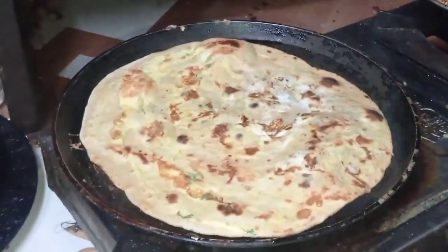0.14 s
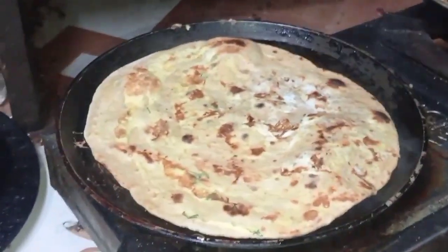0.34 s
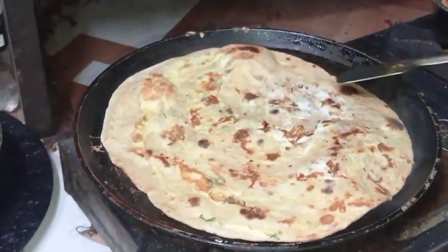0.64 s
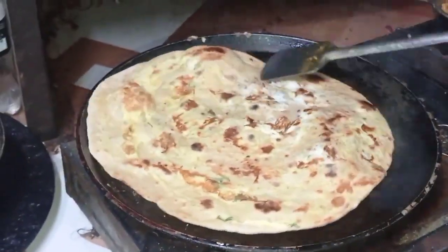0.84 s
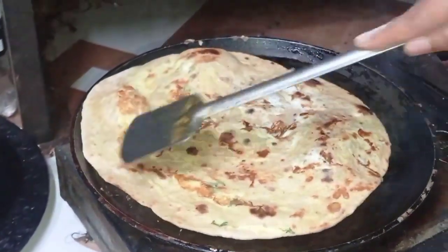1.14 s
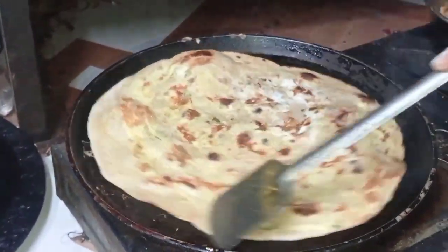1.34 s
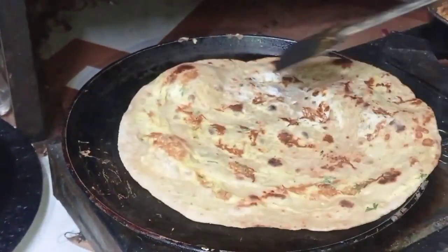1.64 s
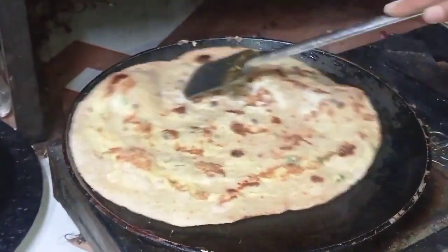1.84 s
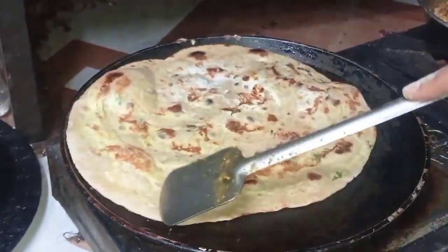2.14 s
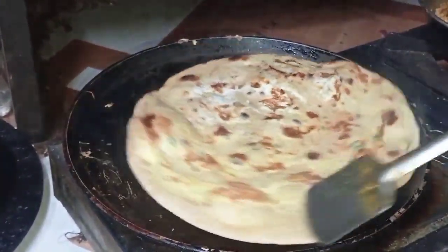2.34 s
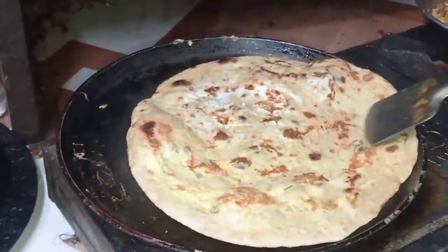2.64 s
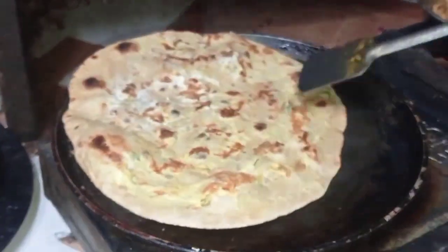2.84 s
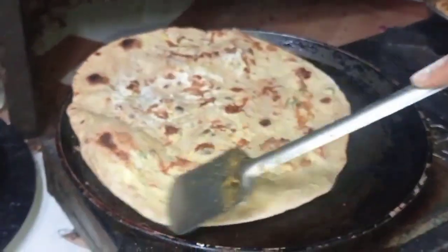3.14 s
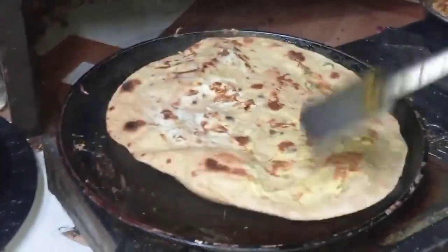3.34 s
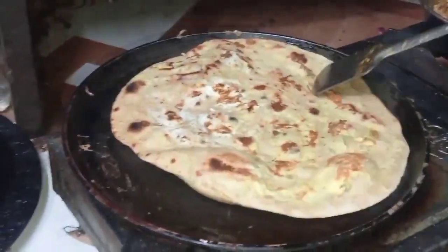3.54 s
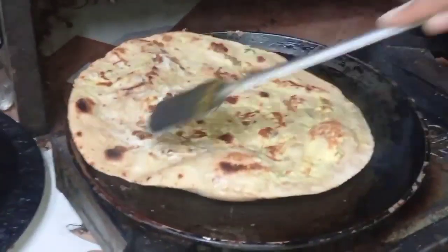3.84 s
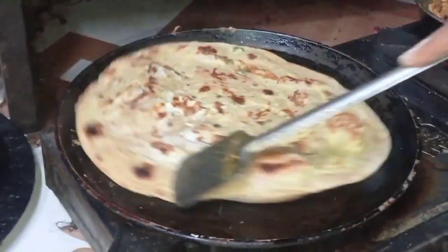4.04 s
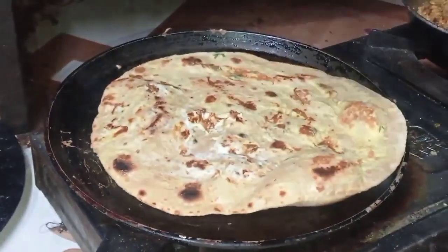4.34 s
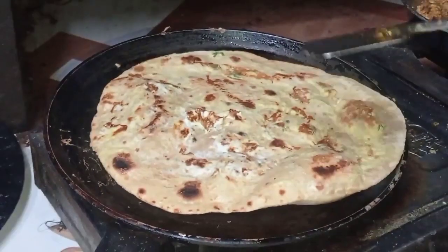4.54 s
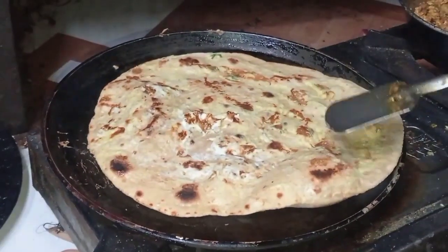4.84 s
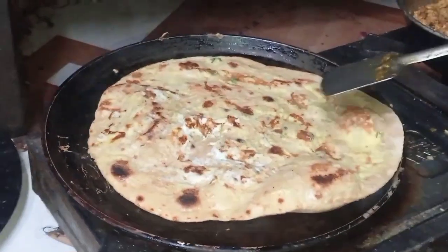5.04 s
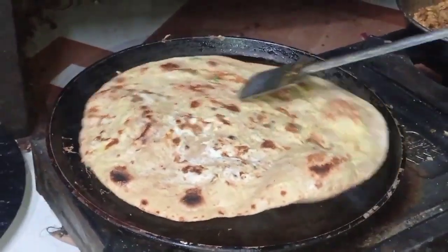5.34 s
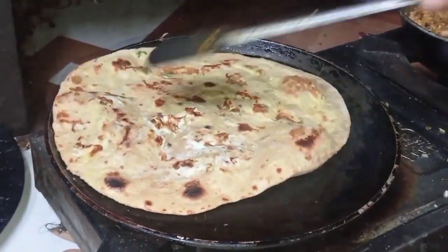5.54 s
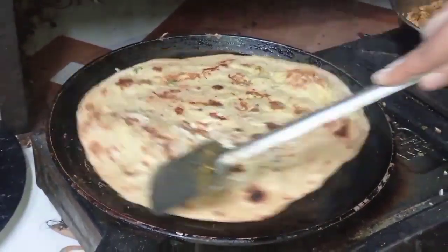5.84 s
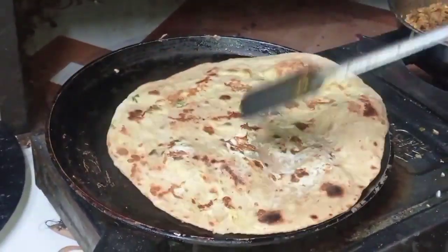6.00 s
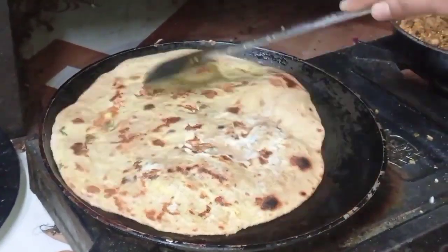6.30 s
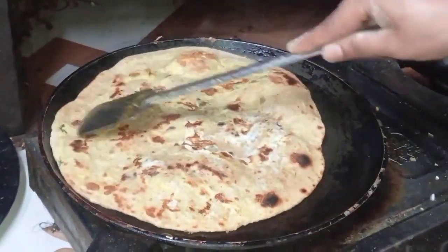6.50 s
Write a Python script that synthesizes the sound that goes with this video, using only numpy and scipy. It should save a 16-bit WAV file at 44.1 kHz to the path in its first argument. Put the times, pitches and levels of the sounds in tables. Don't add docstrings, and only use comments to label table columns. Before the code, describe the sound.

A metal spatula knocks, scrapes and shoves a flatbread around a hot iron griddle, with soft steady sizzling and two hard clanging double blows.

```python
import sys
import numpy as np
from scipy import signal
from scipy.fft import rfft, irfft, next_fast_len
from scipy.io import wavfile
from scipy.ndimage import uniform_filter1d

SR = 44100
rng = np.random.default_rng(int(sys.argv[2]) if len(sys.argv) > 2 else 0)


def output_pcm(signal):
    pcm = np.clip(np.atleast_2d(signal).T, -1, 1) * 32767
    wavfile.write(sys.argv[1], SR, np.round(pcm).astype(np.int16))


def volts_from_db(level):
    exponent = np.asarray(level, float) / 20
    return 10 ** exponent


N = 293916
TOP_HZ = 15550


def rms_one(x):
    return x / np.sqrt(np.mean(x ** 2) + 1e-20)


def band(x, low_hz, high_hz, order):
    return signal.sosfilt(signal.butter(order, [low_hz, high_hz], "band", fs=SR, output="sos"), x)


def add(out, s, sound):
    i = round(s * SR)
    out[i:i + len(sound)] += sound[:N - i]


def in_time(rows):
    s, *columns = np.transpose(rows)
    return [np.interp(np.arange(N) / SR, s, c) for c in columns]


def swell(s, hold, db, rise_db_per_s, fall_db_per_s):
    t = np.arange(N) / SR - s
    below_db = np.maximum(-t * rise_db_per_s, (t - hold) * fall_db_per_s)
    return volts_from_db(db - np.clip(below_db, 0, 150))


def drift(rate):
    r = np.exp(-32 * np.pi * rate / SR)
    slow = signal.lfilter([1], [1, -2 * r, r * r], rng.standard_normal(N // 16 + 4002))[4000:]
    return np.interp(np.arange(N) / 16, np.arange(len(slow)), rms_one(slow))


def grains(per_s, spread_db):
    sizes = volts_from_db(spread_db * np.minimum(rng.exponential(1, N), 5)) * rng.choice([-1, 1], N)
    return rms_one(sizes * (rng.random(N) < per_s / SR))


def coloured(x, spectrum, patchy_db, rate):
    size = next_fast_len(N)
    octave = np.log2(np.maximum(np.fft.rfftfreq(size, 1 / SR), 1))
    hz, db = np.transpose(spectrum)
    shaped = rfft(x, size) * volts_from_db(np.interp(octave, np.log2(hz), db)) * (octave < np.log2(TOP_HZ))
    shared = drift(rate / 3)
    out = np.zeros(N)
    for mid in np.arange(5, 14.5, 0.5):
        if hz[0] / 1.5 < 2 ** mid < hz[-1] * 1.5:
            part = irfft(shaped * np.clip(1 - 2 * abs(octave - mid), 0, 1), size)[:N]
            out += part * volts_from_db(patchy_db * (0.65 * shared + drift(rate)))
    return rms_one(out)


def resonate(x, hz, width):
    r = np.exp(-np.pi * width / SR)
    top = np.array([1, 0, -1]) * (1 - r * r) / 2
    return signal.lfilter(top, [1, -2 * r * np.cos(2 * np.pi * hz / SR), r * r], x)


# (frequency [Hz], bandwidth [Hz], level [dB])
IRON_MODES = [(367, 97, -7), (492, 20.3, 0.5), (576.5, 46, -1), (797, 39, 4.5), (821, 54, 3.5),
              (966, 21, -1.5), (1063, 4.9, -7.5), (1180, 24, 1), (1313, 54, -4.5), (1603, 26, -1.5),
              (1750, 18, -1), (2040, 20, 0.5), (2070, 59, -12.5), (2528, 9.4, 5), (2777, 67, -4.5),
              (2730, 40, 4.5), (3220, 36, -6.5), (3690, 90, -13), (3660, 84, -1), (4240, 1000, -10.5),
              (5700, 86, -6), (6270, 36, -34), (6980, 260, -2.5)]


def iron(x, widen):
    return sum((-1) ** k * volts_from_db(db) * resonate(x, hz, width * widen)
               for k, (hz, width, db) in enumerate(IRON_MODES))


def narrow(hz, width):
    r = np.exp(-2 * np.pi * width / SR)
    draw = rng.standard_normal((2, 60000))[:, :len(hz) + 2000]
    slow = signal.lfilter([1], [1, -2 * r, r * r], draw[0] + 1j * draw[1])[2000:]
    slow = slow / abs(slow) ** 0.19
    hz = hz * (1 + 0.00345 * drift(5.9)[:len(hz)])
    return rms_one(np.real(slow * np.exp(2j * np.pi * np.cumsum(hz) / SR)))


def flow_tones(rows):
    out = np.zeros(N)
    for s, length, first_hz, last_hz, width, db in rows:
        along = np.linspace(0, 1, round(length * SR))
        fade = np.clip(2.5 - 2.0 * abs(2 * along - 1), 0, 1)
        add(out, s, volts_from_db(db) * fade * narrow(first_hz + (last_hz - first_hz) * along, width))
    return out


def sagging(rows):
    return [(s, length, hz, hz * (1 - 0.03), width, db) for s, length, hz, width, db in rows]


def room_air():
    return volts_from_db(-66.0) * rms_one(band(rng.standard_normal(N), 220, 1300, order=1))


# (frequency [Hz], density [dB per Hz])
FLAME_SPECTRUM = [(25, -42), (60, -13.5), (100, -16.5), (135, 4), (170, -7.5), (230, -27.5), (400, -47)]
# (time [s], hold [s], level [dB])
GUSTS = [(0.0, 0.014, -49), (0.112, 0.28, -58.5), (.54, 0.089, -67), (0.867, .01, -62), (1.147, 0.25, -62),
         (1.414, 0.11, -49.5), (1.73, 0.31, -58), (2.174, 0.35, -52.5), (2.637, .01, -45.5),
         (2.782, 0.12, -51.5), (3.233, 0.091, -47), (3.472, 0.068, -54), (3.785, 0.03, -49.5),
         (3.954, 0.043, -56.5), (4.16, 0.25, -67.5), (4.578, 0.0089, -53.5), (4.717, 0.022, -51.5),
         (4.897, 0.24, -57.5), (5.141, 0.32, -63), (5.576, 0.12, -42), (5.79, 0.061, -49.5),
         (6.233, .01, -60), (6.35, .01, -57), (6.45, 0.18, -65)]


def flame():
    flutter = coloured(rng.standard_normal(N), FLAME_SPECTRUM, patchy_db=1.6, rate=9.0)
    gusts = [swell(*gust, rise_db_per_s=298, fall_db_per_s=200) for gust in GUSTS]
    return (np.max(gusts, axis=0) + volts_from_db(-106.5)) * flutter


# (time [s], length [s], pitch [Hz], bandwidth [Hz], level [dB])
HUMS = [
    (6.1, .33, 150, 18, -57.5),
    (0.1, .3, 195, 21, -63.5),
    (2.2, 0.39, 150, 11, -60),
]


def flame_hums():
    return flow_tones(sagging(HUMS))


# (frequency [Hz], density [dB per Hz])
HISS_SPECTRUM = [(25, -23.5), (100, -9), (140, -8.5), (230, -18), (500, -28), (1300, -37), (2200, -13.5),
                 (2900, -9.5), (5300, -6.5), (6700, -7), (8100, -13), (11000, -22), (13000, -33),
                 (16000, -34.5)]
# (time [s], steam hiss [dB], thin top fizz [dB], low simmer [dB])
HEAT = [(0.0, -50, -65, -51.5), (0.55, -50, -68, -61), (0.91, -51.5, -62, -48.5), (1.2, -51, -60, -56.5),
        (1.43, -43, -50, -62), (1.6, -49.5, -62, -58), (2.78, -51, -63, -54), (3.05, -49.5, -64, -60),
        (3.22, -47, -59, -66), (3.42, -49.5, -59, -51), (3.65, -50.5, -51, -59), (3.88, -51, -59, -47.5),
        (4.06, -48, -51, -54), (4.32, -53.5, -66, -66), (5.15, -53.5, -68, -73), (5.95, -49, -65, -60),
        (6.37, -60.5, -78, -40.5), (6.66, -48.5, -63, -57)]


def sizzle():
    hiss_db, fizz_db, simmer_db = in_time(HEAT)
    hiss = coloured(grains(14000, 2.6), HISS_SPECTRUM, patchy_db=1.5, rate=9.9)
    fizz_spectrum = [(13400, -33), (14300, -17), (14900, -14), (15500, -1.5)]
    fizz = coloured(grains(9000, 6.3), fizz_spectrum, patchy_db=2.0, rate=60.0)
    simmer = rms_one(band(grains(5000, 3.8), 1400, 3670, order=2))
    return volts_from_db(hiss_db + 3.5) * hiss + volts_from_db(fizz_db + 2.0) * fizz + volts_from_db(simmer_db) * simmer


# (time [s], length [s], first pitch [Hz], last pitch [Hz], level [dB])
WHISTLES = [(0.104, 0.49, 1250, 1290, -59), (0.627, 0.16, 1300, 1270, -62), (0.967, 0.09, 1130, 1145, -55),
            (1.004, 0.088, 805, 802, -58.5), (1.051, 0.17, 1266, 1295, -62),
            (1.76, 0.39, 1502, 1480, -61.5), (2.464, 0.12, 3500, 3340, -54), (2.591, .17, 3380, 3430, -51),
            (2.752, 0.47, 7850, 7840, -61), (2.765, 0.071, 2700, 2900, -44),
            (2.87, 0.14, 3190, 3220, -48.5), (3.006, 0.067, 3280, 3350, -47.5),
            (3.075, 0.1, 3280, 3390, -51), (3.189, 0.078, 3250, 3240, -52.5), (3.38, 0.19, 3450, 3410, -57),
            (4.52, 0.066, 1150, 1120, -52), (4.599, 0.11, 1100, 1054, -61), (5.498, 0.37, 2600, 2625, -65),
            (5.553, 0.072, 687, 687, -66.5), (5.675, 0.13, 940, 968, -59.5), (5.71, 0.044, 643, 634, -65.5),
            (5.516, 0.42, 6400, 6480, -62), (4.53, .12, 11850, 11700, -82), (4.68, 0.12, 11950, 11900, -80),
            (4.822, 0.19, 11800, 11900, -81.5), (5.11, .11, 13100, 12670, -77),
            (5.1, .11, 12200, 12000, -77), (5.24, .12, 11650, 11600, -80), (5.52, 0.18, 11600, 11200, -83)]
# (time [s], length [s], pitch [Hz], bandwidth [Hz], level [dB])
LEAKS = [
    (0, 0.64, 2574, 130, -54.5),
    (0.6, 0.64, 3323, 440, -53.5),
    (0.697, 0.026, 12600, 460, -58),
    (0.887, 0.028, 11300, 660, -52),
    (2.006, 0.28, 3430, 190, -56),
    (4.19, 0.12, 12400, 500, -71.5),
    (4.18, 0.4, 3180, 96, -58),
    (4.479, 0.029, 3470, 85, -44.5),
    (4.504, 1, 3090, 111, -56.5),
    (6.033, 0.24, 2707, 400, -52),
]


def steam_whistles():
    thin = [(s, length, first, last, 22.0 + 0.006 * first, db) for s, length, first, last, db in WHISTLES]
    return flow_tones(thin + sagging(LEAKS))


# (time [s], peak level [dB], suck [s], push [s], swing [s])
POP = [
    (3.4215, -16, 0.00059, 0.0011, 0.009),
]


def oil_blister():
    out, t = np.zeros(N), np.arange(5000) / SR
    for s, db, suck, shove, swing in POP:
        add(out, s - suck, -0.6 * volts_from_db(db) * np.sin(np.pi * t / suck) * (t < suck))
        tears = abs(np.sin(2 * np.pi * t / shove)) * (t < shove)
        add(out, s, volts_from_db(db) * tears * (0.76 + 0.29 * np.cos(2 * np.pi * 4600 * t)))
        back = np.sin(2 * np.pi * t / swing + 1.2) * np.exp(-t / 0.0041)
        add(out, s + 1.8 * shove, -0.4 * volts_from_db(db) * back)
    return out


# (time [s], peak level [dB])
SHUDDERS = [
    (1.39, -61),
    (3.756, -48),
    (3.99, -60),
    (6.357, -45),
]


def shudders():
    out, t = np.zeros(N), np.arange(8000) / SR
    for s, db in SHUDDERS:
        add(out, s, volts_from_db(db) * np.sin(2 * np.pi * 45.0 * t) * np.exp(-t / 0.019))
    return out


# (time [s], peak level [dB], pitch [Hz], shake [s])
THUDS = [(0.002, -24.5, 777, 0.023), (0.06, -14, 837, 0.022), (0.135, -36, 443, 0.036),
         (0.168, -30.5, 411, 0.021), (0.217, -31.5, 484, 0.015), (0.238, -35, 382, 0.0046),
         (0.297, -48, 435, 0.009), (0.528, -32.5, 408, 0.0081), (0.702, -51, 420, 0.012),
         (0.855, -26.5, 850, 0.022), (1.32, -21, 540, 0.0028), (1.44, -28, 550, 0.011),
         (1.498, -25, 1030, 0.037), (2.413, -24, 910, 0.0092), (2.44, -34, 1006, 0.018),
         (2.43, -35.5, 368, 0.028), (1.539, -36.5, 355, 0.032), (1.41, -30, 347, 0.054),
         (1.47, -32, 364, 0.036), (2.69, -52, 302, .02), (6.05, -48.5, 330, 0.023),
         (3.469, -47, 480, 0.018), (4.35, -35.5, 429, 0.023), (4.488, -27, 495, 0.011),
         (4.509, -33.5, 254, 0.011)]


def thuds():
    out, t = np.zeros(N), np.arange(5000) / SR
    for s, db, hz, shake in THUDS:
        push = rng.standard_normal(len(t)) * np.exp(-t / shake) * (1 - np.exp(-t / 0.0015))
        push = band(push, 0.5 * hz, 1.34 * hz, order=2)
        pair = resonate(push, hz, 37.0) + 0.5 * resonate(push, 0.887 * hz, 126.0)
        add(out, s, volts_from_db(db - 2.5) * pair / np.max(abs(pair)))
    return out


# (time of full speed [s], glide [s], crust skid [dB], iron rumble [dB], rise [dB per s])
SHOVES = [(0.826, 0.0099, -46.5, -62, 598), (1.297, .015, -49, -33.5, 500), (1.47, 0.068, -37, -27, 98),
          (1.88, 0.03, -36.5, -53, 181), (2.297, 0.13, -37.5, -57, 446), (2.769, 0.069, -35.5, -41.5, 450),
          (3.266, 0.078, -38, -51, 267), (3.64, 0.024, -42.5, -52, 400), (4.119, 0.056, -38, -46, 189),
          (4.56, .14, -56.5, -68, 200), (5.428, 0.038, -37, -48, 287.5), (5.851, 0.14, -36.5, -40.5, 548),
          (6.06, 0.19, -49.5, -53, 300), (6.32, .035, -34, -50, 298), (6.265, .005, -36, -39, 400),
          (6.66, .01, -45, -54, 600)]
# (time [s], skid [dB], rumble [dB], skid fade [dB per s], rumble fade [dB per s])
JOLTS = [(0.0, -41, -20.5, 350, 800), (0.063, -39.5, -26, 240, 250), (0.553, -55, -66, 150, 300),
         (0.685, -58, -65, 450, 200), (0.854, -36, -23, 171, 317), (1.261, -32.5, -45, 300, 100),
         (1.317, -32, -25, 280, 130), (1.392, -25.5, -24.5, 450, 69), (2.058, -60, -73, 120, 100),
         (2.41, -42, -27, 257, 313), (3.663, -32, -22, 112, 223), (3.753, -16, -14, 227, 140),
         (4.002, -34.5, -39.5, 430.5, 341), (4.486, -61, -39.5, 45, 163), (5.28, -53, -70, 157, 190),
         (6.271, -33, -24, 59, 124), (6.357, -23, -17, 203, 159)]


def motion():
    slowing_db_per_s, steeper = 278, 1.37
    skids, rumbles = [], []
    for s, glide, skid_db, rumble_db, rise in SHOVES:
        skids.append(swell(s, glide, skid_db, rise, slowing_db_per_s))
        rumbles.append(swell(s, glide, rumble_db, steeper * rise, steeper * slowing_db_per_s))
    ends = [jolt[0] for jolt in JOLTS[1:]] + [N / SR]
    for (s, skid_db, rumble_db, skid_fade, rumble_fade), end in zip(JOLTS, ends):
        moving = swell(s, 0.15, 0, SR, 296) * swell(0, end, 0, SR, SR)
        skids.append(moving * swell(s, 0, skid_db, SR, skid_fade))
        rumbles.append(moving * swell(s, 0, rumble_db, SR, rumble_fade))
    return np.max(skids, axis=0), np.max(rumbles, axis=0)


# (frequency [Hz], density [dB per Hz])
SKID_SPECTRUM = [(150, -74), (300, -46), (630, -6), (940, 0), (1760, -9.5), (2710, -9), (6470, -7.5),
                 (9000, -18), (12800, -33), (15000, -23.5), (16000, -52)]


def slides():
    press, rumble = uniform_filter1d(motion(), size=150)
    light = volts_from_db(-35.5) * np.tanh(press / volts_from_db(-30.0))
    skid = coloured(grains(6000, 2.05), SKID_SPECTRUM, patchy_db=1.5, rate=36.0)
    grit = band(skid, 1220, 4030, order=2)
    ringing = rms_one(rms_one(iron(grit, widen=0.51)) + 1.86 * rms_one(grit))
    catches = band(grains(2000, 4.3) * volts_from_db(0.42 * drift(69.0)), 380, 935, order=1)
    out = volts_from_db(4.0) * light * (skid + volts_from_db(-16.5) * ringing)
    out += volts_from_db(-3.5) * (press - light) * ringing
    return out + volts_from_db(-7.5) * rumble * rms_one(iron(catches, widen=1.66))


# (time [s], peak level [dB], pitch [Hz], contact [s])
BOUNCES = [(0.851, -24, 790, .003), (0.859, -16.5, 970, 0.0027), (0.866, -22, 730, 0.0024),
           (0.872, -23, 920, 0.0022), (0.877, -30, 1500, .002), (0.888, -33, 696, 0.0039),
           (0.905, -34, 2100, .002), (1.265, -22, 2520, 0.00088), (1.275, -35, 1600, .002),
           (1.316, -23, 3100, .0015), (1.33, -32, 560, 0.012), (1.394, -19, 2970, .002),
           (1.405, -27, 3300, .006), (1.423, -27, 560, .006), (1.454, -30, 590, 0.0041),
           (1.466, -23, 1130, .005), (1.481, -36, 597, 0.0044), (1.495, -17.5, 990, .005),
           (1.521, -23, 1020, .005), (1.53, -20.5, 1910, .004), (1.554, -31, 1900, .003),
           (3.737, -31, 7400, .001), (3.759, -7, 1290, 0.0026), (3.765, -16, 800, .002),
           (3.781, -25.5, 800, 0.0044), (3.79, -23.5, 3500, .002), (3.796, -21, 3600, .002),
           (3.801, -12.5, 800, 0.0037), (3.812, -13, 2000, 0.0057), (3.823, -27, 3500, 0.0017),
           (3.828, -15, 1250, 0.0072), (3.849, -20.5, 890, .004), (3.857, -27, 1600, 0.0026),
           (3.878, -28.5, 1500, 0.0033), (6.28, -27, 1100, .003), (6.286, -19, 900, .003),
           (6.297, -28, 1000, .003), (6.304, -27, 2500, .003), (6.364, -6, 1000, 0.0009),
           (6.375, -9, 1540, 0.0034), (6.378, -26, 2980, .002), (6.394, -14, 3500, .0008),
           (6.401, -18, 920, 0.0045), (6.422, -16, 3250, 0.00087), (6.431, -17.5, 1260, 0.0032),
           (6.444, -29, 2560, 0.0027), (6.449, -23, 780, 0.0045)]


def bounces():
    out, t = np.zeros(N) + 1e-18, np.arange(3000) / SR
    for s, db, hz, contact in BOUNCES:
        width = 0.45 * hz
        hit = resonate(rng.standard_normal(len(t)) * np.exp(-t / contact), hz, width)
        hit = resonate(hit, hz, 2 * width)
        add(out, s, volts_from_db(db) * hit / np.max(abs(hit)))
    out = band(out, 250, 9700, order=3)
    return volts_from_db(-4.0) * out + volts_from_db(1.5) * iron(out, widen=1.6)


# (time [s], body level [dB], tick level [dB], tick pitch [Hz], contact [s])
BLOWS = [(0.056, -20, -27.5, 2460, 0.0048), (0.062, -23, -37, 2500, 0.0035),
         (0.852, -13, -40, 3240, 0.0033), (0.934, -22, -32, 1600, 0.0017), (1.26, -25, -34, 1910, 0.0051),
         (1.315, -35, -36, 3250, 0.005), (1.391, -32, -26.5, 3340, 0.0076), (2.409, -18, -52, 2500, 0.0045),
         (3.664, -5.5, -39.5, 2450, 0.0031), (3.753, 5.5, -13.5, 3500, 0.0043),
         (3.902, -29, -50, 3070, 0.0089), (4.005, -42, -42, 6900, 0.0083),
         (4.484, -30, -43.5, 3470, 0.0056), (6.269, -5.5, -45, 3200, 0.0041),
         (6.357, 3.5, -15.5, 3470, 0.0034)]
# (time [s], tick level [dB], tick pitch [Hz])
TOUCHES = [(0.191, -44, 3990), (0.555, -43, 2280), (0.683, -44, 1800), (1.631, -45, 3300),
           (2.061, -41.5, 2400), (2.174, -53, 6700), (3.58, -52.5, 11000), (4.27, -56.5, 7400),
           (5.279, -51, 4070), (5.285, -52, 4530), (5.29, -52, 3120), (5.844, -56, 2340)]


def knocks():
    chatter, ticks, t = np.zeros(N) + 1e-18, np.zeros(N), np.arange(1500) / SR
    light = [(s, db - 11, db, hz, 0.0062) for s, db, hz in TOUCHES]
    for s, db, tick_db, tick_hz, contact in sorted(BLOWS + light):
        burst = rng.standard_normal((2, len(t)))
        add(chatter, s, volts_from_db(db) * burst[0] * np.exp(-t / contact) * (1 - np.exp(-t / 0.00082)))
        tick = volts_from_db(tick_db) * burst[1] * np.exp(-t / (0.63 * contact))
        add(ticks, s, volts_from_db(19.0) * resonate(tick, tick_hz, 0.28 * tick_hz) + 0.18 * tick)
    chatter = band(chatter, 627, 1800, order=2)
    crack = volts_from_db(-31.0) * band(ticks, 7520, 16000, order=2)
    ticks = band(ticks, 1220, 9400, order=2)
    ringing = volts_from_db(7.5) * iron(chatter, widen=2.0) + volts_from_db(6.5) * iron(ticks, widen=0.81)
    return crack + ringing + volts_from_db(1.5) * ticks


def kitchen(x):
    t60_s = 0.35
    size = next_fast_len(N + SR)
    hz = np.fft.rfftfreq(size, 1 / SR)
    response = 0
    for k, lag in enumerate(rng.uniform(0.008, 0.025, 10)):
        once = volts_from_db(-60 * lag / t60_s * (3.5 + hz / 5000)) * np.exp(-2j * np.pi * hz * lag)
        response = response + (-1) ** k * once / (1 - once)
    return irfft(rfft(x, size) * response, size)[:N]


def scene():
    air = room_air()
    griddle = knocks() + bounces() + shudders() + thuds() + oil_blister() + slides()
    room = volts_from_db(-14.5) * kitchen(griddle)
    heat = sizzle() + flame() + steam_whistles() + flame_hums()
    return (griddle + room + heat + air)[None]


def duck(x):
    power = x ** 2
    for lag_s in (0.006, 0.06):
        r = np.exp(-1 / (lag_s * SR))
        power = signal.lfilter([1 - r], [1, -r], power)
    over_db = np.maximum(10 * np.log10(power + 1e-12) + 33, 0)
    treble = signal.sosfiltfilt(signal.butter(4, 8600, "high", fs=SR, output="sos"), x)
    return x - treble * (1 - volts_from_db(-0.6 * over_db))


def low_pass(x):
    return signal.sosfilt(signal.butter(12, 16870, fs=SR, output="sos"), x)


def record(dry):
    heard = signal.sosfilt(signal.cheby2(10, 30, TOP_HZ + 250, fs=SR, output="sos"), duck(dry))
    rounded = heard / (1 + (heard / 1.1) ** 4) ** 0.2
    return low_pass(rounded)


dry = scene()
out = record(dry)
output_pcm(out)
```